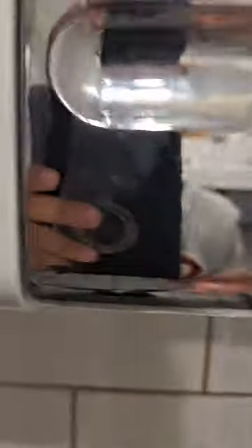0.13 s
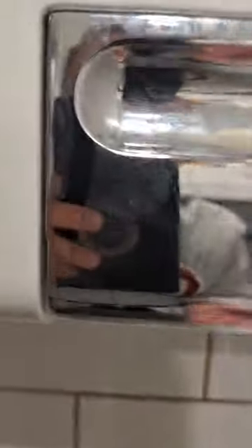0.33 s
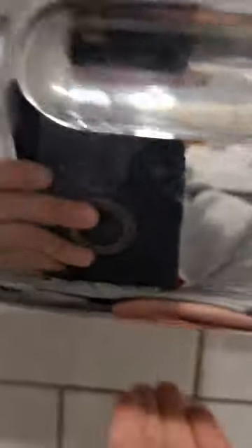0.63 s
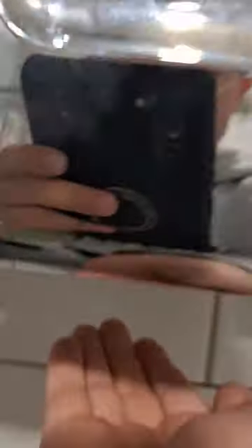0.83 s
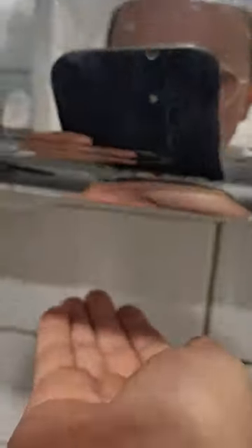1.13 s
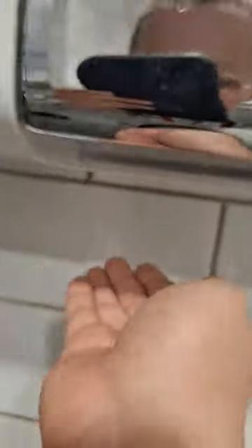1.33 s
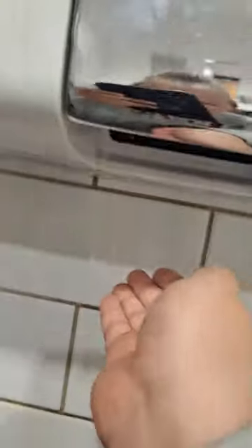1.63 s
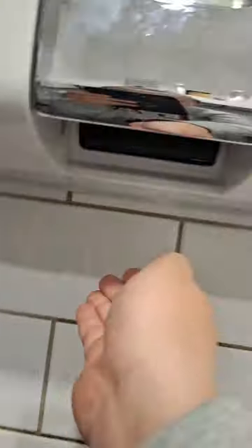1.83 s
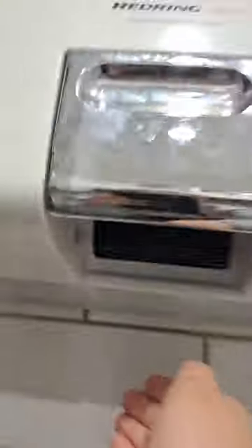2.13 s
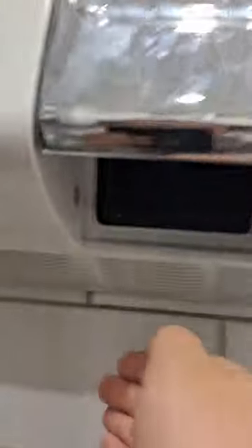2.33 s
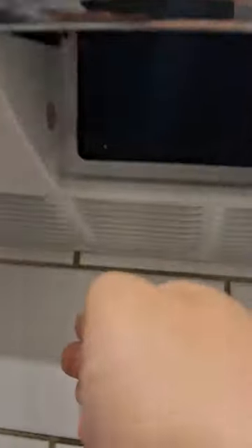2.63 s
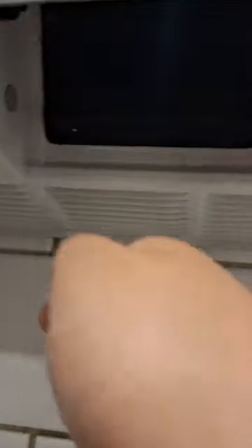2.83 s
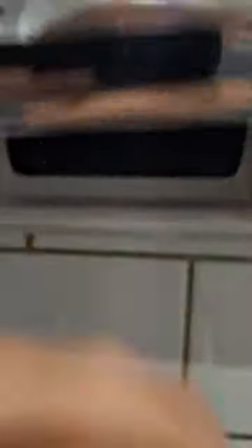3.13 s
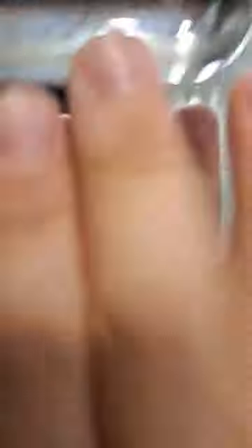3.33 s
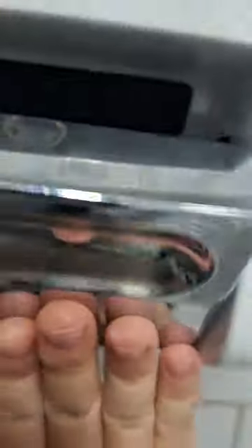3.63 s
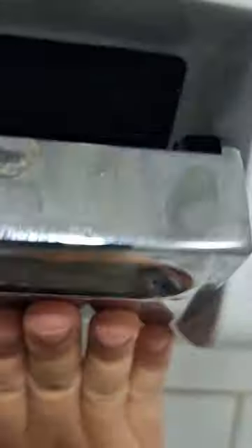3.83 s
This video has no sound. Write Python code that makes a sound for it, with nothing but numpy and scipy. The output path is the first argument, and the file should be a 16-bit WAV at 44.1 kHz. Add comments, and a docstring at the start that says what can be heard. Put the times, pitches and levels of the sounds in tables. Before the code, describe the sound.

Hand dryer blowing a loud, low rush of air, with two bursts of buffeting wind

```python
"""A hand dryer blows steadily in a tiled washroom, very close: noise roar, whine tones, narrow booms.
Its jet, banded stereo noise, rushes and hisses over a turning hand, with low rumble and passing resonances.
Twice the deflected air hits the right microphone port hard: enveloped low noise with a tearing edge.
The microphone moves from the front of the dryer to the outlet, then beside the nozzle."""
import sys
import numpy as np
from scipy import signal
from scipy.fft import rfft, irfft, next_fast_len
from scipy.io import wavfile
from scipy.ndimage import uniform_filter1d, map_coordinates

SR = 44100
rng = np.random.default_rng(int(sys.argv[2]) if len(sys.argv) > 2 else 0)


def digitize_waveform(pressure):
    """Quantize a signal to 16-bit integers and store it at the path in sys.argv[1].

    Rows of a 2-D input are taken as channels; values are limited to [-1, 1].
    """
    field = np.atleast_2d(pressure).T
    bounded = np.clip(field, -1, 1)
    quanta = np.round(bounded * 32767).astype(np.int16)
    wavfile.write(sys.argv[1], SR, quanta)


N = 176400  # 4 s

# Spectrum of wind thumps on the port. Each row: frequency in Hz, density in dB per Hz.
THUMP_SPECTRUM = [(20, -34), (38, -14), (62, 0), (95, 0), (140, -3), (200, -11), (330, -25), (700, -42),
                  (2000, -70)]
# Spectrum of their tearing edge. Each row: frequency in Hz, density in dB per Hz.
TEAR_SPECTRUM = [(70, -12), (170, 2), (280, 0), (450, -7), (800, -22), (2000, -44), (6000, -60)]


def amp(db):
    """Decibels to gain."""
    return 10 ** (np.asarray(db) / 20)


def unit(x):
    """Scale to rms 1."""
    return x / np.sqrt(np.mean(x ** 2) + 1e-20)


def along(points, hz):
    """Interpolate (Hz, value) points on a log frequency axis."""
    f, v = np.transpose(points)
    return np.interp(np.log(hz + 1), np.log(f + 1), v)


def curves(rows):
    """One value per sample for each column after the time in seconds."""
    s, *cols = np.transpose(rows)
    return [np.interp(np.arange(N) / SR, s, c) for c in cols]


def wobble(rate_hz):
    """A smooth random curve through normal knots, rate_hz of them a second."""
    knots = rng.standard_normal(N // 50)
    return map_coordinates(knots, [np.arange(N) * rate_hz / SR], mode="mirror")


def filtered(x, response):
    """Multiply the spectrum of x by a response of frequency in Hz."""
    m = next_fast_len(N + SR // 2)
    return irfft(rfft(x, m) * response(np.fft.rfftfreq(m, 1 / SR)), m)[..., :N]


def panned(lean_db):
    """Left and right gains for a left-minus-right level difference."""
    return amp(np.array([lean_db, -lean_db]) / 2)


def resonance(centre_hz, half_width_hz):
    """Stereo noise through a peak whose gain is halved half_width_hz off centre."""
    white = rng.standard_normal((2, N))
    return filtered(white, lambda hz: 1 / (1 + ((hz - centre_hz) / half_width_hz) ** 2))


def bell_curve(centre_s, half_length_s):
    """Gaussian envelope, peak 1, down to exp(-2) at half_length_s."""
    t = np.arange(N) / SR
    return np.exp(-2 * ((t - centre_s) / half_length_s) ** 2)


def noise(spectrum):
    """Mono noise of rms 1 with the given spectrum."""
    return unit(filtered(rng.standard_normal(N), lambda hz: amp(along(spectrum, hz))))


def air(spectrum):
    """Stereo noise of rms 1; tiles ripple its spectrum finely, the moving hand shifts broad patches."""
    # Depth of the ripple from tile echoes. Each row: frequency in Hz, depth in dB.
    ripple_depth = [(1000, 2), (3000, 1.3), (8000, .6), (15000, .4)]
    # Depth of the hand's colour patches. Each row: frequency in Hz, depth in dB.
    patch_depth = [(500, .3), (1500, 1.1), (4000, 1.1), (8000, .7), (15000, .5)]
    # Likeness of the two ports. Each row: frequency in Hz, coherence.
    coherence = [(80, .88), (500, .76), (720, .08), (1200, -.1), (2800, -.17), (4400, 0)]

    freqs_hz, _, z = signal.stft(rng.standard_normal((2, N)), SR, nperseg=4096)
    ripple = uniform_filter1d(rng.standard_normal(z.shape), size=3, axis=1)  # along frequency
    ripple = uniform_filter1d(ripple, size=18, axis=2)  # along time
    patches = uniform_filter1d(rng.standard_normal(z.shape[1:]), size=32, axis=0)
    patches = uniform_filter1d(patches, size=8, axis=1)
    colour_db = along(ripple_depth, freqs_hz)[:, None] * unit(ripple)
    colour_db = colour_db + along(patch_depth, freqs_hz)[:, None] * unit(patches)
    pair = signal.istft(z * amp(colour_db), nperseg=4096)[1][:, :N]

    def mid_side_response(hz):
        angle = np.arccos(np.clip(along(coherence, hz), -1, 1)) / 2
        return amp(along(spectrum, hz)) * np.array([np.cos(angle), np.sin(angle)])

    mid, side = filtered(pair, mid_side_response)
    return unit(np.array([mid + side, mid - side]))


def places():
    """Share of the microphone places (front, outlet, beside nozzle) over time."""
    # Microphone moves. Each row: centre in seconds, length in seconds.
    moves = [(1.18, 0.29), (3.485, 0.31)]
    t = np.arange(N) / SR
    first, second = [np.clip((t - s) / length_s + .5, 0, 1) for s, length_s in moves]
    return np.array([1 - first, first - second, second]).clip(0, 1)


def roar(place):
    """Broadband blower noise; its colour crossfades at equal power between places."""
    # Roar spectra at front, outlet and beside nozzle. Each row: frequency in Hz, density in dB per Hz.
    front = [(25, -28), (55, -7), (115, -2.5), (180, 1), (260, -2.5), (430, 0.5), (680, -1.5), (830, -5),
             (1050, -2), (1300, -8), (1700, -10.5), (2100, -17), (3500, -60)]
    near = [(25, -20), (55, 10.5), (115, -9.5), (200, 1), (330, 2), (440, 5.5), (490, -2), (560, 2),
            (700, 0.5), (880, -4.5), (1080, 1.5), (1300, -4), (1650, -5), (1850, -12.5), (3500, -41)]
    beside = [(25, -34), (55, -20), (115, -19), (195, 3.5), (440, 4), (490, -3), (560, -3.5), (720, 1.5),
              (880, -5.5), (1080, -4.5), (1300, -9.5), (1850, -13.5), (3500, -60)]
    return sum(np.sqrt(share) * air(colour) for share, colour in zip(place, (front, near, beside)))


def booms(place):
    """Narrow resonances of housing and room hum, partly steadied in level, and drift in pitch together."""
    # Each row: centre in Hz, half-width in Hz, level over the roar in dB at front, outlet, beside nozzle.
    modes = [(86.8, 3.5, -9.5, -8, -13.5), (144.3, 3, -7, -24, -15), (225.3, 6.1, -12.5, -9, -12),
             (537, 35, -8.5, -16, -11), (1074, 47, -23, -11, -22)]
    coherence, steadiness = 0.84, .8  # steadiness 1 holds the level, 0 lets it swell and fade
    angle = np.arccos(coherence) / 2
    drift_s = np.cumsum(.012 * wobble(10)) / SR  # relative pitch drift, integrated
    out = 0
    for centre_hz, half_width_hz, *levels_db in modes:
        ring = signal.hilbert(resonance(centre_hz, half_width_hz))
        drifted = (ring * np.exp(2j * np.pi * centre_hz * drift_s)).real
        mid, side = drifted / np.abs(ring) ** steadiness
        mid, side = np.cos(angle) * unit(mid), np.sin(angle) * unit(side)
        out = out + amp(np.array(levels_db) @ place) * np.array([mid + side, mid - side])
    return out


def whine(place):
    """Thin tones that wander with the shaft speed and flutter separately at each port."""
    # Blower tones, in Hz.
    tones_hz = [1118, 3014, 5420]
    # One row per tone: level over the roar in dB at front, outlet, beside nozzle.
    tone_levels = [(-16, -24, -29), (-31, -37, -40), (-31, -37, -40)]
    flutter_db, speed_wander = 2, .0012  # wander relative to shaft speed
    warped_s = np.cumsum(1 + speed_wander * wobble(39.3)) / SR
    out = 0
    for tone_hz, levels_db in zip(tones_hz, tone_levels):
        ports = []
        for _ in range(2):
            flutter = amp(flutter_db * wobble(20))
            ports.append(flutter * np.sin(2 * np.pi * tone_hz * warped_s + wobble(10)))
        out = out + amp(np.array(levels_db) @ place) * unit(np.array(ports))
    return out * panned(lean_db=np.array([5.0]))


def blower():
    """Roar, booms and whine share one level; their balance follows the microphone place."""
    # Each row: time in seconds, level in dB.
    roar_level = [(.35, -18.5), (.7, -19.5), (1.14, -19.5), (1.25, -24.5), (1.5, -25.5), (1.9, -23.5),
                  (2.75, -24.5), (3.0, -28.5), (3.45, -26), (3.7, -24.5), (4, -26)]
    # Stereo lean of roar and booms. Each row: frequency in Hz, left minus right in dB.
    roar_lean = [(90, 3.5), (200, 1.5), (600, -1), (1100, 1.5), (1800, -0.5)]
    level_db, = curves(roar_level)
    place = places()
    body = roar(place) * amp(0.47 * wobble(17)) + booms(place)
    body = filtered(body, lambda hz: panned(along(roar_lean, hz)))
    return amp(level_db) * (body + whine(place))


def rush():
    """Turbulent noise of the jet leaving the outlet; it changes colour beside the nozzle."""
    # Each row: time in seconds, level in dB, left minus right in dB.
    rush_level = [(.36, -26.5, -2.5), (.8, -28.5, -1.5), (1.13, -27.5, -1), (1.23, -32.5, -1.5),
                  (1.9, -32, -2.5), (2.4, -30.5, -3), (2.78, -31, 1), (2.82, -32.5, -3), (3.07, -34.5, -4),
                  (3.49, -34.5, -3.5), (3.61, -32.5, -2.5), (3.85, -34, -2.5), (4, -31.5, -2)]
    # Spectra ahead of and beside the nozzle. Each row: frequency in Hz, density in dB per Hz.
    ahead_spectrum = [(1000, -16), (1850, -2), (2400, 2.5), (3150, 0.5), (3600, -1), (4600, -1),
                      (5200, -0.5), (5600, -4), (6900, -4.5), (8050, -3), (8600, -11), (10000, -48)]
    beside_spectrum = [(1000, -18), (1850, -1), (2200, 1), (2500, 4.5), (2900, 1), (3700, 0), (5000, -2.5),
                       (6100, -3), (7950, -2.5), (8600, -7), (9500, -7), (10500, -35)]
    # Stereo lean. Each row: frequency in Hz, left minus right in dB.
    rush_lean = [(4000, 3.5), (6500, 5.2), (8000, 4), (9000, 2)]
    level_db, lean_db = curves(rush_level)
    beside = places()[-1]
    stream = np.sqrt(1 - beside) * air(ahead_spectrum) + np.sqrt(beside) * air(beside_spectrum)
    stream = filtered(stream, lambda hz: panned(along(rush_lean, hz)))
    return stream * amp(level_db) * panned(lean_db)


def hiss():
    """High turbulent noise of air on the hand."""
    # Each row: time in seconds, level in dB, left minus right in dB.
    hiss_level = [(.36, -33, -1), (.62, -35.2, 0), (.97, -35.8, -.7), (1.14, -34.8, -.3),
                  (1.26, -40.5, -.3), (2.16, -37.6, -4), (2.55, -38, 0), (2.75, -38, 2), (2.85, -40.9, 0),
                  (3.48, -42.6, -.3), (3.56, -39.3, .6), (3.85, -39.4, .6), (4, -37.3, 1)]
    # Each row: frequency in Hz, density in dB per Hz.
    hiss_spectrum = [(6000, -40), (8400, -5), (9100, -.7), (10400, -.7), (12500, .3), (15900, -.7),
                     (16400, -50)]
    level_db, lean_db = curves(hiss_level)
    return air(hiss_spectrum) * amp(level_db) * panned(lean_db)


def jet():
    """The air stream's rush and hiss with a slight shared flutter."""
    return (rush() + hiss()) * amp(0.42 * wobble(17))


def hand_rumble():
    """The jet breaks on the hand with a low rumble."""
    # Each row: time in seconds, level in dB.
    rumble_level = [(.3, -27), (.88, -33), (.98, -20.5), (1.15, -35), (1.4, -32.5), (2.35, -42),
                    (2.75, -26), (3.15, -24.5), (3.4, -32.5), (3.78, -34), (3.92, -36.5)]
    # Each row: frequency in Hz, density in dB per Hz.
    rumble_spectrum = [(40, -25), (60, -11), (82, -4.5), (120, -7), (260, -11), (400, -16.5), (800, -22.5),
                       (2000, -45)]
    level_db, = curves(rumble_level)
    return amp(level_db) * air(rumble_spectrum) * panned(lean_db=np.array([3.0]))


def swishes():
    """Resonances of the gap between outlet, hand and microphone swell and fade as the hand turns."""
    # Each row: centre in seconds, half-length in seconds, centre in Hz, half-width in Hz, peak level in dB.
    bands = [(.45, 0.23, 8100, 350, -51), (1.094, .1, 1400, 400, -28), (1.9, 0.4, 5200, 170, -44),
             (2.264, .12, 227.5, 7.5, -22), (2.685, 0.22, 3030, 300, -39), (3.185, 0.16, 3020, 800, -37.5),
             (3.34, 0.1, 1550, 230, -40), (3.99, 0.11, 1290, 380, -35)]
    out = 0
    for s, half_length_s, centre_hz, half_width_hz, db in bands:
        band = unit(resonance(centre_hz, half_width_hz))
        out = out + amp(db) * bell_curve(s, half_length_s) * band
    return out


def wind_buffet():
    """Eddies thump on the right port; tearing at higher pitch grows faster than the wind."""
    # Steady wind on the right port. Each row: time in seconds, level in dB.
    wind_level = [(.3, -44), (1.05, -36), (1.09, -14.5), (1.33, -14), (1.49, -22), (1.7, -22), (1.92, -34),
                  (2.0, -23), (2.36, -26), (2.41, -15), (2.8, -15), (2.82, -38)]
    full_wind_db, tear_below_full_db = -15, -6
    tear_growth = 2.05  # dB of tearing per dB of wind
    wind_db, = curves(wind_level)
    eddies_db, grain_db = 1.4 * wobble(45), 2.2 * wobble(160)
    thumps = amp(wind_db) * unit(amp(eddies_db) * noise(THUMP_SPECTRUM))
    tearing = unit(amp(tear_growth * eddies_db + grain_db) * noise(TEAR_SPECTRUM))
    tear_db = full_wind_db + tear_below_full_db + tear_growth * (wind_db - full_wind_db)
    return np.array([np.zeros(N), thumps + amp(tear_db) * tearing])


def gusts():
    """Short bell-shaped puffs thrown off the hand: a thump with a tearing edge, mostly at the right port."""
    # Each row: centre in seconds, thump level at the peak in dB, tearing level at the peak in dB.
    puffs = [(1.097, -9, -16), (1.135, -10.5, -19), (1.187, -7, -11), (1.235, -11, -14), (1.29, -10, -9.5),
             (1.338, -11, -17), (1.54, -10, -28), (1.65, -10, -27), (2.1, -18, -32), (2.415, -11, -20),
             (2.457, -12.5, -14), (2.502, -9.5, -19), (2.537, -12, -23), (2.6, -14, -17),
             (2.635, -13, -12.5), (2.755, -9, -12), (2.79, -15, -16)]
    half_length_s, left_leak_db = .022, -22.5
    thump = noise(THUMP_SPECTRUM)
    tear = amp(2.8 * wobble(160)) * noise(TEAR_SPECTRUM)
    out = 0
    for s, thump_db, tear_db in puffs:
        bell = bell_curve(s, half_length_s)
        puff = amp(thump_db) * unit(bell * thump) + amp(tear_db) * unit(bell * tear)
        out = out + bell.std() * puff  # undoes the whole-length rms scaling
    return np.array([amp(left_leak_db) * out, out])


def scene():
    """The dryer, its jet on the hand, and wind on the right port."""
    return blower() + jet() + hand_rumble() + swishes() + wind_buffet() + gusts()


def record(dry):
    """Cut the deepest bass, fade in, round off peaks near full scale and cut the top."""
    low_cut_hz, top_hz, start_s = 26, 15800, 0.25
    t = np.arange(N) / SR - start_s
    x = signal.sosfilt(signal.butter(2, low_cut_hz, "highpass", fs=SR, output="sos"), dry)
    x = x * np.clip(t / 0.097 + 0.13, 0, 1) * (t > 0)  # silence, then gain 0.13 to 1 in 84 ms
    x = x / (1 + np.abs(x) ** 6) ** (1 / 6)
    return filtered(x, lambda hz: np.clip((top_hz - hz) / 100 + .5, 0, 1))


dry = scene()
out = record(dry)
digitize_waveform(out)
```